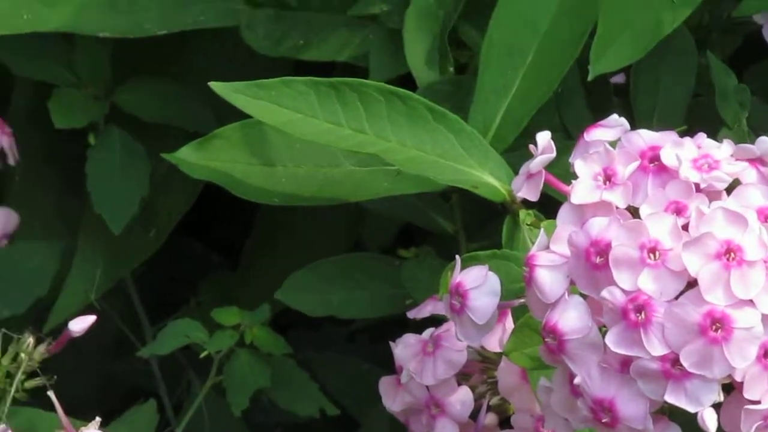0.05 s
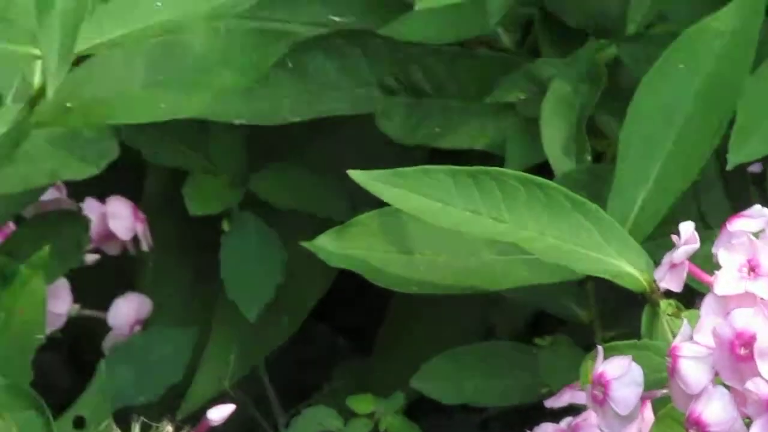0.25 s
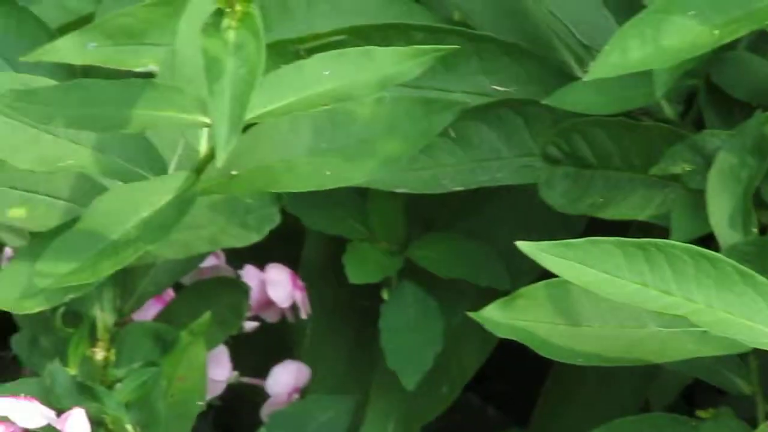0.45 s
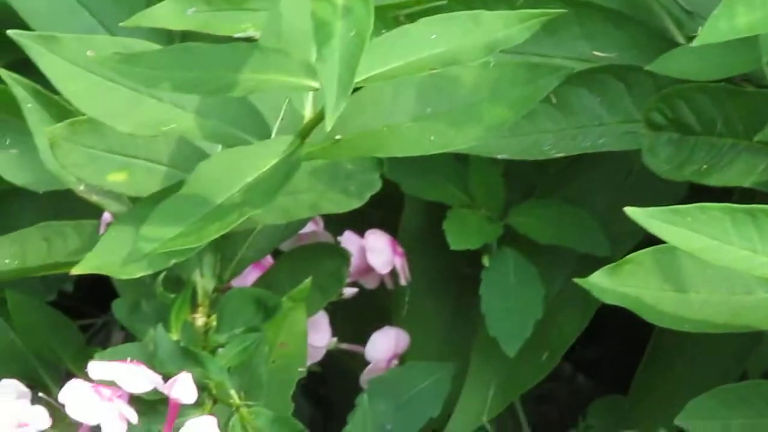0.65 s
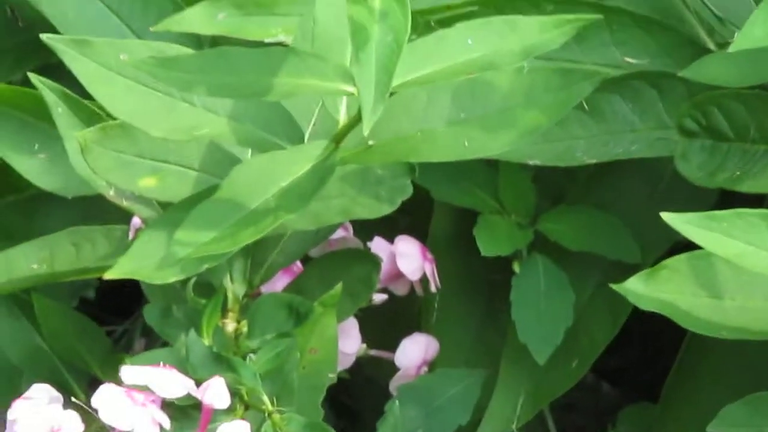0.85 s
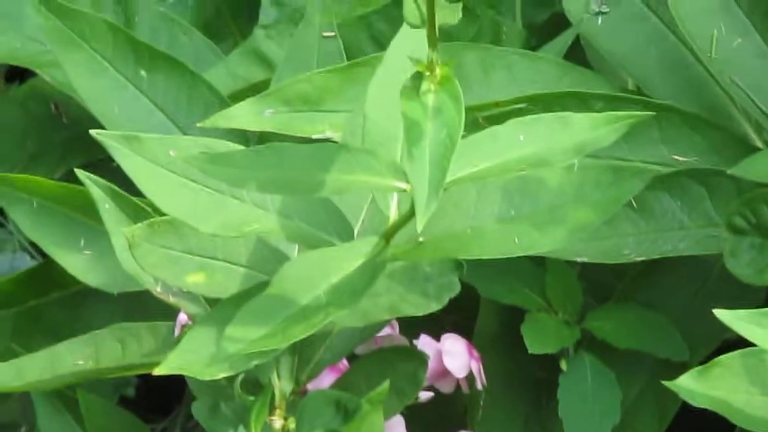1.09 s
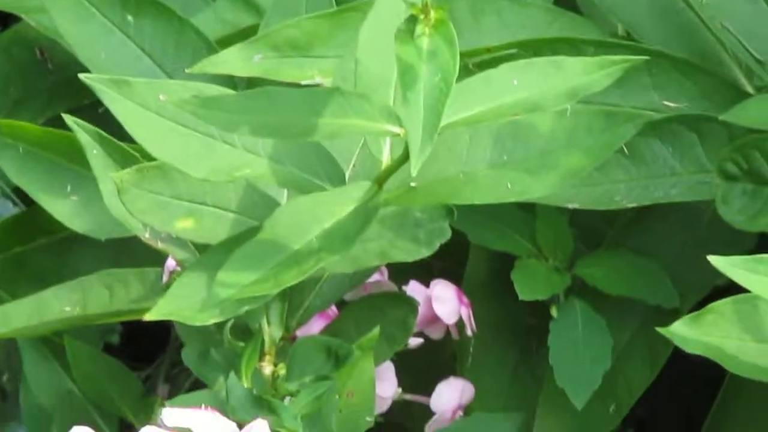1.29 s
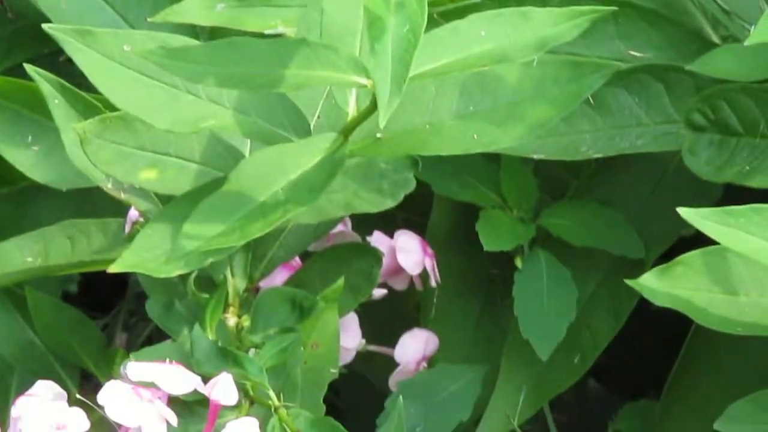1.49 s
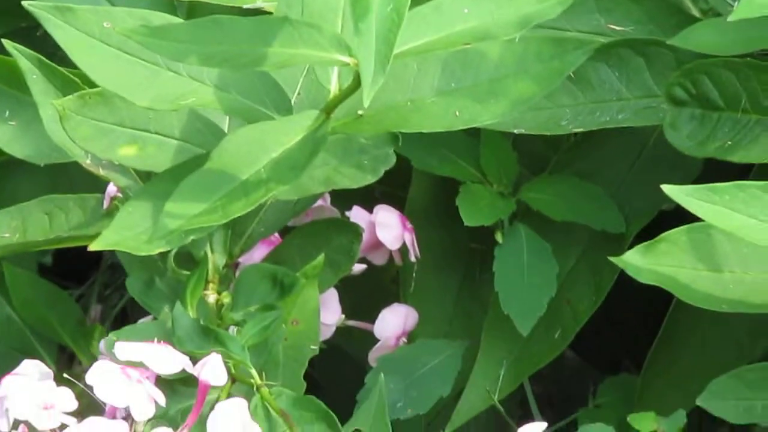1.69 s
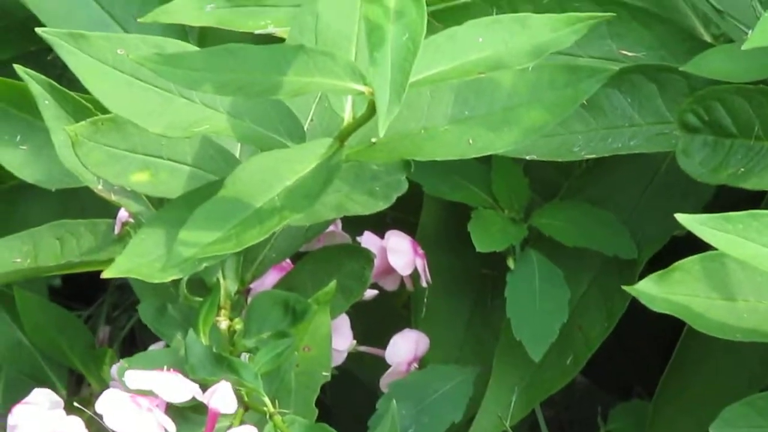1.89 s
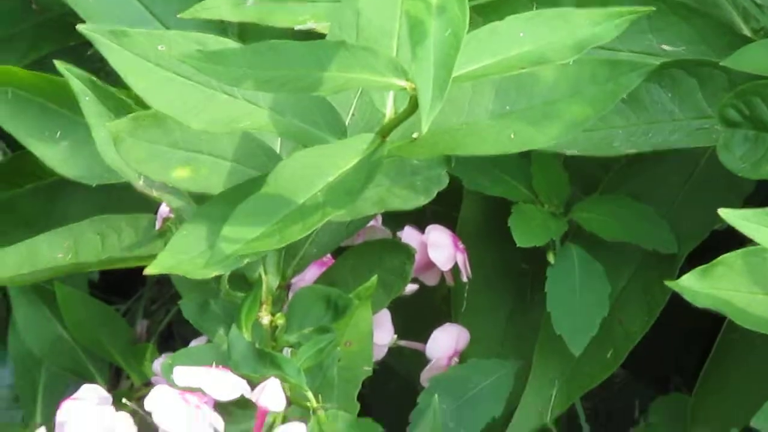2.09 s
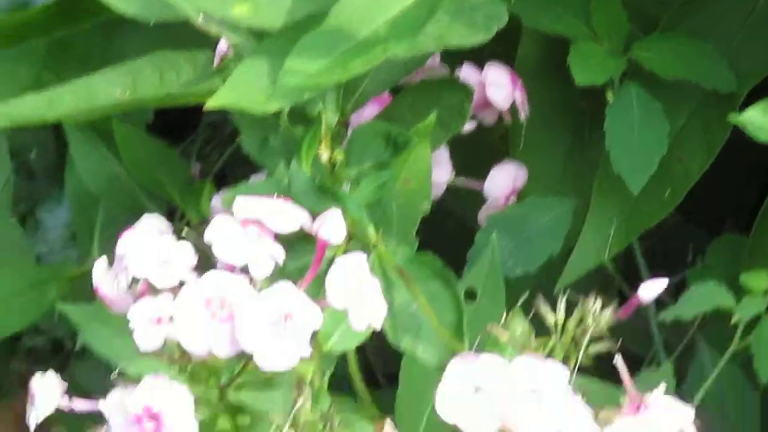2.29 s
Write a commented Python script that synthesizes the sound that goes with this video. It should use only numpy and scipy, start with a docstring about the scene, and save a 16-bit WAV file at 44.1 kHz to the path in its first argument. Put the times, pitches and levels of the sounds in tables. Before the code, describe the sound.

A cricket-like insect trilling close by in a garden, with wind rumbling on the microphone.

```python
"""A flower bed in a garden, heard through a microphone with a left and a right port.
Close by an insect trills, each wing stroke a short, high, arching whistle that the foliage scatters.
Farther off one insect buzzes, another throbs slowly, and a chorus sings over the garden's hiss.
Wind buffets the microphone, mostly its left port; there is one small click and a few faint ticks."""
import sys
import numpy as np
from scipy import signal
from scipy.fft import rfft, irfft
from scipy.io import wavfile
from scipy.ndimage import uniform_filter1d, map_coordinates

SR = 44100
rng = np.random.default_rng(int(sys.argv[2]) if len(sys.argv) > 2 else 0)


def output_pcm(signal):
    """Save a mono or channel-first signal as 16-bit PCM at the path in sys.argv[1].

    Samples are clipped to [-1, 1] before scaling.
    """
    pcm = np.clip(np.atleast_2d(signal).T, -1, 1) * 32767
    wavfile.write(sys.argv[1], SR, np.round(pcm).astype(np.int16))


N = 108045
T = np.arange(N) / SR


# one wing stroke, close up (time from its middle [s], pitch [Hz], level [dB])
STROKE_ARCH = [(-.009, 8200, -26), (-.0065, 8320, -5), (-.004, 8410, -.5), (0, 8570, 0), (.002, 8620, 0),
               (.004, 8550, -.5), (.006, 8410, -1.5), (.0085, 8150, -1), (.0105, 7950, -5),
               (.012, 7850, -26)]

def wing_stroke(middle_s, level_db, shift_hz, rasp_hz=30):
    """The scraper speeds up and slows along the wing's file, so the whistle arches."""
    sounding = (T > middle_s + STROKE_ARCH[0][0]) & (T < middle_s + STROKE_ARCH[-1][0])
    t = T[sounding] - middle_s
    rasp = unit(uniform_filter1d(rng.standard_normal(N // 8), size=16))[:len(t)]
    hz = curve(STROKE_ARCH, t) + shift_hz + rasp_hz * rasp
    envelope = amp(level_db + curve(STROKE_ARCH, t, column=2))
    whistle = np.zeros(N)
    whistle[sounding] = envelope * np.sin(2 * np.pi * np.cumsum(hz) / SR)
    return whistle


# pace of the near insect's long trill (stroke number, time [s])
TRILL_PACE = [(0, -.004), (9, .464), (21, 1.075), (26, 1.334), (28, 1.44), (33, 1.697), (37, 1.913)]
# its strokes after a pause (time [s], level [dB], pitch shift [Hz])
TRILL_RESTART = [(2.399, -2, -220), (2.449, -3, -100)]

def trill(spread_db=1.04, spread_hz=15):
    """The insect close to the microphone: about nineteen wing strokes a second, no two alike."""
    times = curve(TRILL_PACE, np.arange(TRILL_PACE[-1][0] + 1))
    unevenness = rng.standard_normal((len(times), 2)) * [spread_db, spread_hz]
    strokes = [(s, db, hz) for s, (db, hz) in zip(times, unevenness)]
    return amp(-47) * sum(wing_stroke(*row) for row in strokes + TRILL_RESTART)


def foliage(song, t60_s=.22, delay_s=.012):
    """Leaves scatter the song into a dense, dying cloud of reflections, different at each port."""
    t = T[:SR // 2]
    cloud = rng.standard_normal((2, len(t))) * amp(-60 * t / t60_s) * (t > delay_s)
    scattered = signal.fftconvolve(song[None], cloud, axes=1)[:, :N]
    return np.array([unit(side) * song.std() for side in scattered])


# the trill's paths as the microphone turns
# (time [s], direct left [dB], direct right [dB], echo left [dB], echo right [dB])
PATH_LEVELS = [(0, 1.5, -14, -2, -3), (.35, 6, -24, -7, 3), (.65, 2.5, -11, -1, -6), (1, 2.5, -22, 1, -3.5),
               (1.4, 3, -19, -4, 3), (1.8, 1, -25, 0, 3), (2.4, 4, -15, -2, 0)]
# reflections from close by (delay [s], level [dB], port [0 left, 1 right])
NEAR_ECHOES = [(.0145, -1, 0), (.0175, -9, 0), (.009, -4, 1), (.0145, -3, 1), (.017, -9, 1)]

def flower_bed(song, sway_s=.000288):
    """The song reaches the microphone directly, by a few swaying echoes and through the foliage."""
    gains = amp([curve(PATH_LEVELS, column=k) for k in (1, 2, 3, 4)])
    echoes = np.zeros((2, N))
    for delay_s, db, port in NEAR_ECHOES:
        echoes[port] += amp(db) * delayed(song, delay_s + sway_s * wander(per_s=1.22)[0])
    turn = np.pi * T / T[-1]  # the reflections change as the microphone moves
    scatter = np.cos(turn) * foliage(song) + np.sin(turn) * foliage(song)
    return gains[:2] * song + gains[2:] * echoes + amp(-10) * scatter


# an insect farther off, which drops away briefly and returns lower (time [s], level [dB], pitch [Hz])
BUZZ_COURSE = [(0, -66, 7450), (.05, -65, 7540), (.1, -80, 7400), (.3, -81, 7170), (.335, -67.5, 7250),
               (.7, -67, 7480), (2, -65, 7470), (2.45, -70, 7500)]

def buzz(beat_hz=96, beat_depth=.45, spread_hz=75):
    """A far whistle chopped by fast wing beats, its pitch unsteady from beat to beat."""
    beats = 1 + beat_depth * np.cos(2 * np.pi * beat_hz * T)
    hz = curve(BUZZ_COURSE, column=2) + spread_hz * wander(beat_hz)
    whistle = unit(np.sin(2 * np.pi * np.cumsum(hz, axis=1) / SR))
    blur = amp(-9) * band(np.median(hz), width_hz=130)
    return amp(curve(BUZZ_COURSE)) * unit(beats * whistle + blur)


# a third insect, far off to the left (time [s], level [dB])
THROB_PEAKS = [(.14, -59.5), (.43, -61), (.76, -60), (1.03, -57.5), (1.33, -58), (1.62, -58.5),
               (1.94, -56.5), (2.2, -58)]

def throb(width_s=.06):
    """Slow swells of an insect's note, blurred by distance."""
    swells = sum(amp(db) * np.exp(-.5 * ((T - s) / width_s) ** 2) for s, db in THROB_PEAKS)
    return pan(swells * band(hz=4880, width_hz=210), right_db=-5)


# colour of the far chorus and the trill's lingering scatter (frequency [Hz], relative level [dB])
HIGH_BAND_COLOUR = [(7600, -38), (8000, 4.5), (8300, 6.5), (8600, 8), (8900, -3.5), (9300, -34),
                    (10500, -50)]
# the two together (time [s], level [dB])
HIGH_BAND_LEVEL = [(0, -59), (1.8, -57), (2.05, -60), (2.45, -61)]

def chorus_and_scatter():
    """A high band of far insects and the trill's lingering scatter, fainter once the trill pauses."""
    return pan(amp(curve(HIGH_BAND_LEVEL)) * tinted(HIGH_BAND_COLOUR), right_db=1.5)


# wind on each port of the microphone (time [s], level [dB])
LEFT_PORT_WIND = [(0, -37), (.14, -41), (.28, -27.5), (.42, -27), (.56, -29), (.68, -31), (.8, -30.5),
                  (.88, -35.5), (.96, -29.5), (1.06, -32.5), (1.14, -30), (1.26, -27.5), (1.35, -33.5),
                  (1.5, -37.5), (1.62, -28.5), (1.72, -26.5), (1.84, -27), (1.92, -35), (2.04, -27.5),
                  (2.16, -26), (2.23, -42.5), (2.33, -30), (2.45, -37)]
RIGHT_PORT_WIND = [(0, -42), (.27, -44), (.345, -28.5), (.41, -51), (.49, -35.5), (.62, -47.5), (.9, -39.5),
                   (1.15, -50), (1.4, -33.5), (1.445, -24.5), (1.5, -42.5), (1.68, -42.5), (1.75, -31),
                   (1.88, -47), (2.02, -34), (2.08, -28), (2.22, -40.5), (2.45, -40)]
# steady wind's rumble and the extra body of strong gusts (frequency [Hz], relative level [dB])
RUMBLE_COLOUR = [(8, -9), (25, 4.5), (70, 6.5), (120, -2.5), (200, -16), (320, -28), (600, -70),
                 (1500, -82), (6000, -120)]
GUST_COLOUR = [(30, -5.5), (130, 10.5), (250, -5), (400, -14), (600, -16.5), (1000, -53), (2000, -88),
               (6000, -120)]

def wind(flutter_db=2.5, gust_growth=2.63):
    """Air buffets each port with a fluttering rumble that brightens in gusts."""
    rumble_db = np.array([curve(LEFT_PORT_WIND), curve(RIGHT_PORT_WIND)])
    rumble_db += flutter_db * wander(per_s=18.6)
    gust_db = -44.5 + gust_growth * (rumble_db + 31)  # the body grows faster than the rumble
    return amp(rumble_db) * tinted(RUMBLE_COLOUR) + amp(gust_db) * tinted(GUST_COLOUR)


# eddies right on the left port (time [s], peak level [dB], pitch [Hz])
EDDY_HITS = [(.204, -24, 140), (.26, -22, 80), (.311, -15, 130), (.394, -18, 190), (.4125, -6, 170),
             (.428, -12, 130), (.484, -18, 80), (.525, -15, 230), (.533, -13, 290), (.539, -7, 130),
             (.554, -10, 155), (.574, -8, 130), (.598, -13, 190), (.604, -14, 160), (.615, -17, 190),
             (.666, -2, 175), (.676, -8, 95), (.738, -15, 110), (.788, -15, 110), (.938, -18, 105),
             (.974, -19, 145), (1.022, -21, 220), (1.08, -14, 280), (1.104, -20, 220), (1.13, -21, 220),
             (1.145, -19, 160), (1.22, -16, 145), (1.311, -11, 160), (1.318, -9, 150), (1.347, -18, 150),
             (1.361, -15, 210), (1.713, -14, 205), (1.81, -6.5, 180), (1.819, -16, 240), (1.838, -15, 175),
             (1.982, -15, 130), (2.005, -11, 175), (2.038, -15, 230), (2.046, -7, 150), (2.069, -10, 180),
             (2.129, -10, 170), (2.149, -9, 140), (2.177, -19, 160)]

def eddies(wake_db=-24.5, wake_s=.009):
    """Each eddy hits the port as a smooth thump wrapped in churning air."""
    thumps, wake_power = np.zeros((2, 2, N))
    for s, db, hz in EDDY_HITS:
        phase = np.exp(2j * np.pi * rng.random())
        pulse = phase / (1 - 2j * np.pi * hz * (T - s) / 3) ** 3  # about one swing of pressure
        thumps[0] += amp(db) * pulse.real
        wake_power[0] += amp(db + wake_db) ** 2 * np.exp(-((T - s) / wake_s) ** 2)
    return thumps + np.sqrt(wake_power) * tinted(GUST_COLOUR)


# the click's two contacts, near the centre (time [s], level [dB])
CLICK_CONTACTS = [(.3692, -38), (.3703, -29.5)]
# their colour (frequency [Hz], relative level [dB])
CONTACT_COLOUR = [(300, -14), (600, -8), (820, -2), (1300, 3), (2000, -7), (3800, -17), (5500, -13),
                  (6300, -19), (7300, -5), (8600, -10), (10400, -27), (15000, -39)]
# the modes it rings (frequency [Hz], level [dB], time to fall 60 dB [s])
RINGING_MODES = [(810, -41, .05), (1090, -31, .028), (1340, -37, .025)]

def click(rise_s=.0003, decay_s=.0015, tail_db=-26, tail_s=.01):
    """A small, dry double contact with a short tail; the first touch sets three low modes ringing."""
    envelope = np.zeros(N)
    for s, db in CLICK_CONTACTS:
        t = np.maximum(T - s, 0)
        fade = np.exp(-t / decay_s) + amp(tail_db) * np.exp(-t / tail_s)
        envelope += amp(db) * np.minimum(t / rise_s, 1) * fade
    t = np.maximum(T - CLICK_CONTACTS[0][0], 0)
    ring = sum(amp(db - 60 * t / t60) * np.sin(2 * np.pi * hz * t) for hz, db, t60 in RINGING_MODES)
    burst = tinted(CONTACT_COLOUR)
    burst = unit(burst + .24 * burst[::-1])  # partly shared by the two ports
    return pan(envelope * burst + ring, right_db=-1)


# ticks, faint at both ports (time [s], level [dB])
FAINT_TICKS = [(.2574, -64), (.5135, -59), (.817, -57), (1.5175, -62), (1.771, -56)]

def ticks(rise_s=.0006, decay_s=.002):
    """A few high, dry ticks, each a tiny burst of noise."""
    envelope = np.zeros(N)
    for s, db in FAINT_TICKS:
        t = np.maximum(T - s, 0)
        envelope += amp(db) * np.minimum(t / rise_s, 1) * np.exp(-t / decay_s)
    return envelope * band(hz=9300, width_hz=2000)


# the garden's distant hiss (frequency [Hz], relative level [dB])
HISS_COLOUR = [(30, 10.5), (150, 12.5), (300, 4.5), (550, 2), (850, 0), (1050, 0.5), (1500, -3), (2500, -5),
               (4200, -7), (5500, -9), (6600, -13), (8800, -15), (10000, -23.5), (12500, -29), (15500, -40)]
# its likeness at the two ports (frequency [Hz], correlation [0-1])
HISS_LIKENESS = [(100, 0.6), (600, 0.77), (1200, 0.47), (2500, 0.16), (5000, 0.06), (14000, 0.2)]

def garden_hiss(level_db=-48.5, patch_db=.93):
    """Distant hiss with faint drifting patches, more alike at the two ports in the bass."""
    frames = dict(nperseg=1024, noverlap=768)
    hz, _, (left, unrelated) = signal.stft(rng.standard_normal((2, N)), SR, **frames)
    likeness = spectrum(HISS_LIKENESS, hz)[:, None]
    right = likeness * left + np.sqrt(1 - likeness ** 2) * unrelated
    patches = uniform_filter1d(rng.standard_normal(left.shape), size=10, axis=0)  # smooth in frequency
    patches = unit(uniform_filter1d(patches, size=14, axis=1))  # and in time
    colour = amp(spectrum(HISS_COLOUR, hz)[:, None] + patch_db * patches)
    hiss = signal.istft(np.array([left, right]) * colour, **frames)[1][:, :N]
    return pan(amp(level_db) * unit(hiss), right_db=.7)


def amp(db):
    """Decibels to gain."""
    return 10 ** (np.asarray(db) / 20)


def unit(x):
    """Scales to rms 1."""
    return x / np.sqrt(np.mean(x ** 2) + 1e-20)


def curve(rows, t=T, column=1):
    """Joins the rows of a table by straight lines."""
    rows = np.array(rows, float)
    return np.interp(t, rows[:, 0], rows[:, column])


def spectrum(rows, hz):
    """Reads a table on a log-frequency axis."""
    f, value = np.transpose(rows)
    return np.interp(np.log(hz + 1), np.log(f + 1), value)


def noise(colour):
    """Two unrelated noises shaped by the gain colour(hz), at rms 1."""
    white = rfft(rng.standard_normal((2, N)))
    return unit(irfft(white * colour(np.fft.rfftfreq(N, 1 / SR)), N))


def tinted(rows):
    """Noise with a tabled spectrum."""
    return noise(lambda hz: amp(spectrum(rows, hz)))


def band(hz, width_hz):
    """Noise in one resonance."""
    return noise(lambda f: 1 / (1 + ((f - hz) / width_hz) ** 2))


def wander(per_s):
    """Two smooth random curves of rms 1."""
    return noise(lambda f: np.exp(-(f / per_s) ** 2))


def delayed(x, delay_s):
    """Delays a sound by a steady or moving time."""
    return map_coordinates(x, [(T - delay_s) * SR], order=3)


def pan(x, right_db):
    """Sets the right channel's level against the left."""
    return x * amp([[0], [right_db]])


def scene():
    """The garden at the microphone's two ports."""
    insects = flower_bed(trill()) + buzz() + throb() + chorus_and_scatter()
    return insects + garden_hiss() + wind() + eddies() + click() + ticks()


# narrow dips in the microphone's response (frequency [Hz], width [Hz])
MICROPHONE_DIPS = [(5900, 280), (7835, 390)]
BAND_LIMIT_HZ = 15720

def record(dry):
    """The microphone: two narrow dips in the treble, then the band limit."""
    for hz, width_hz in MICROPHONE_DIPS:
        dry = signal.lfilter(*signal.iirnotch(hz, hz / width_hz, SR), dry)
    lowpass = signal.firwin(511, BAND_LIMIT_HZ, window=("kaiser", 9), fs=SR)
    return signal.oaconvolve(dry, lowpass[None], "same")


dry = scene()
out = record(dry)
output_pcm(out)
```